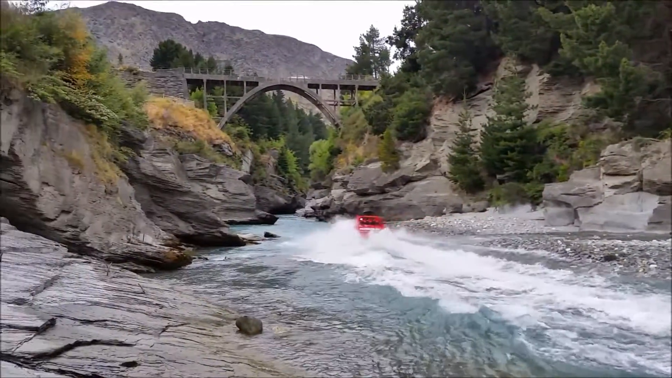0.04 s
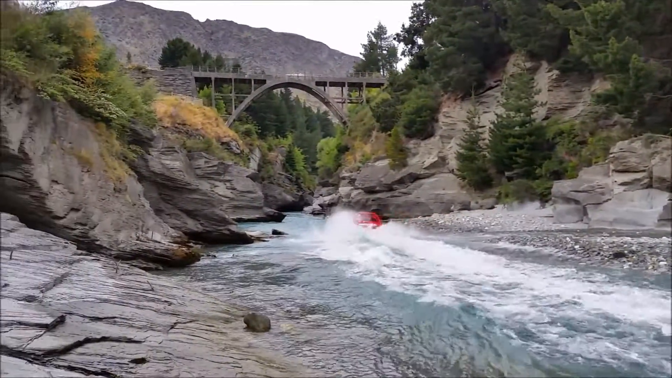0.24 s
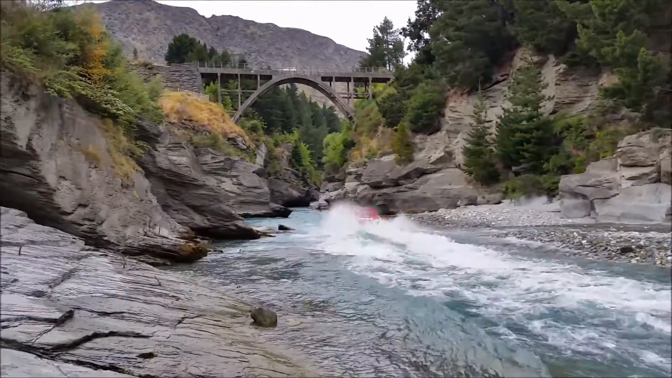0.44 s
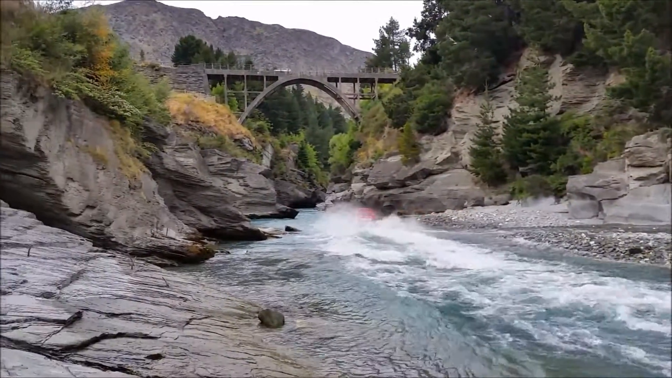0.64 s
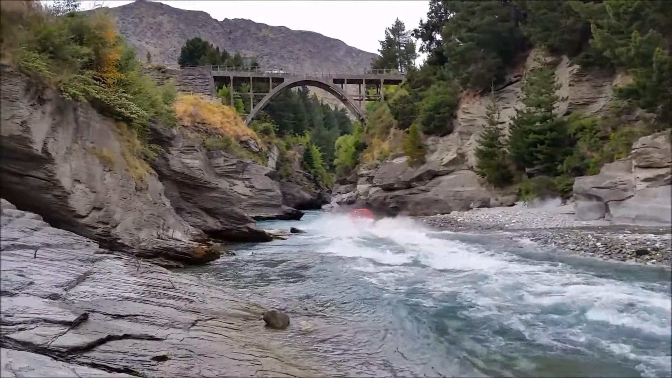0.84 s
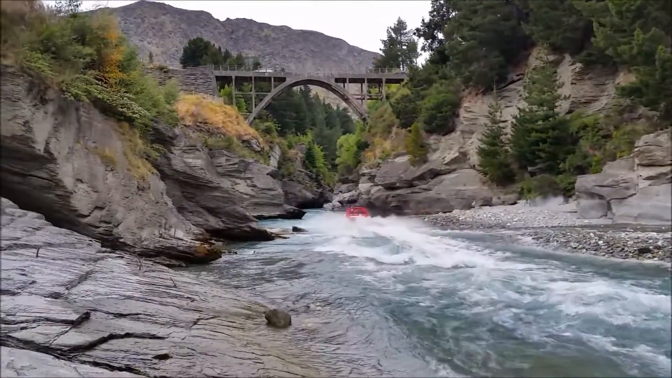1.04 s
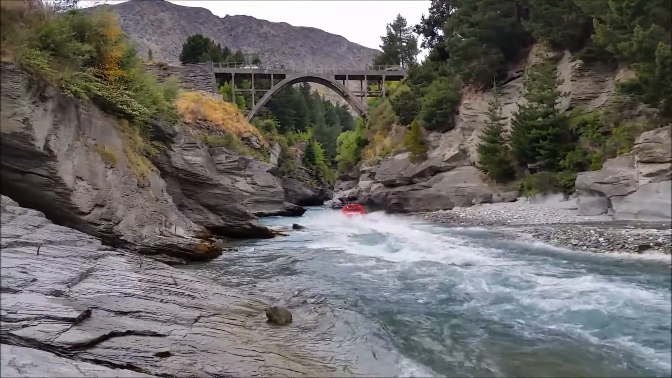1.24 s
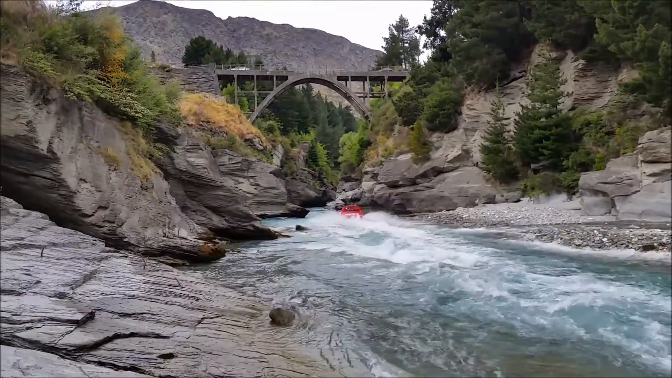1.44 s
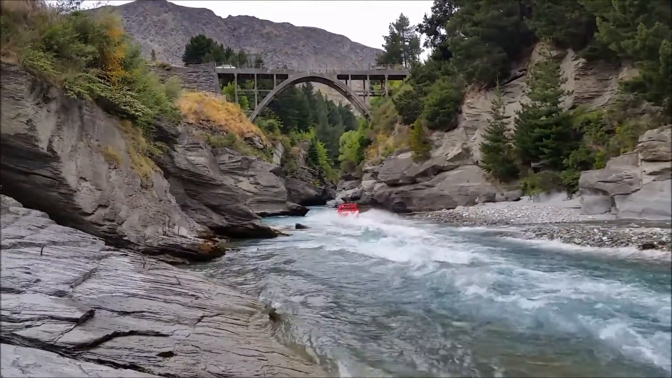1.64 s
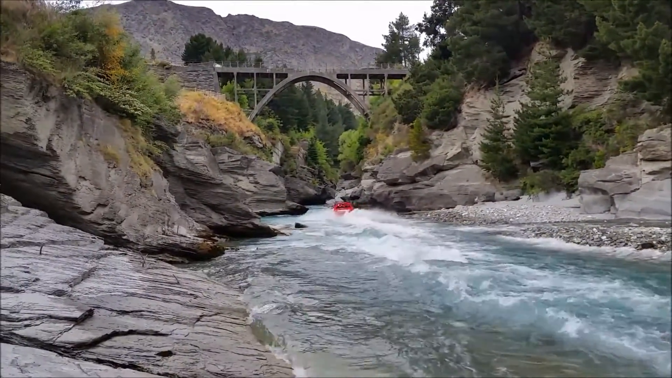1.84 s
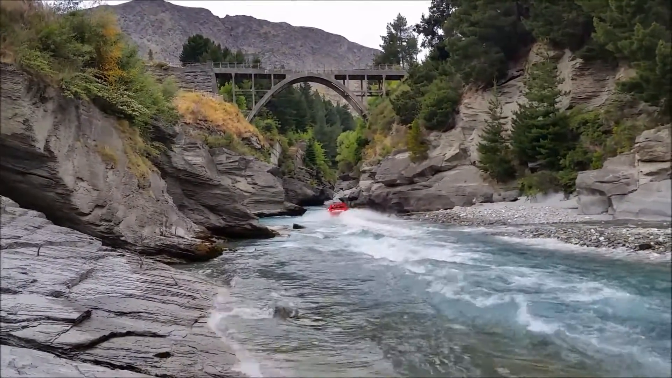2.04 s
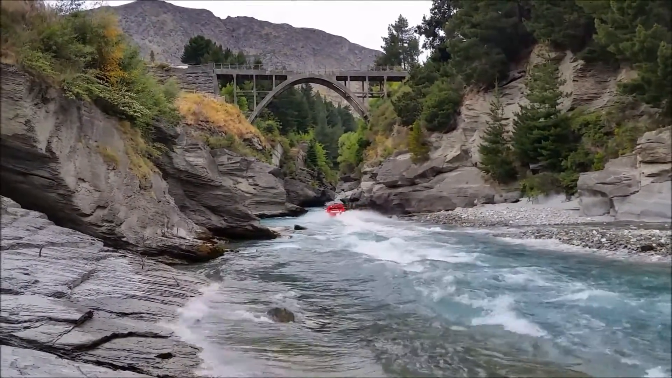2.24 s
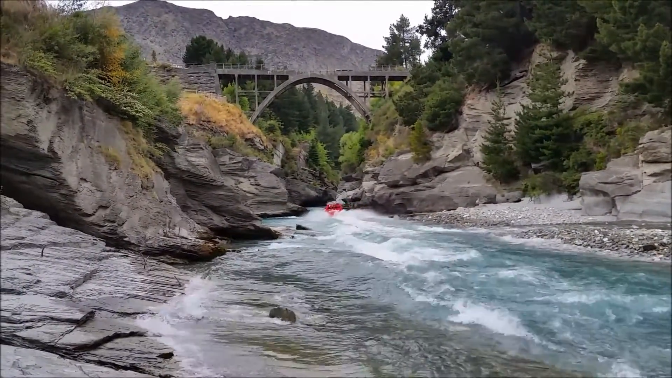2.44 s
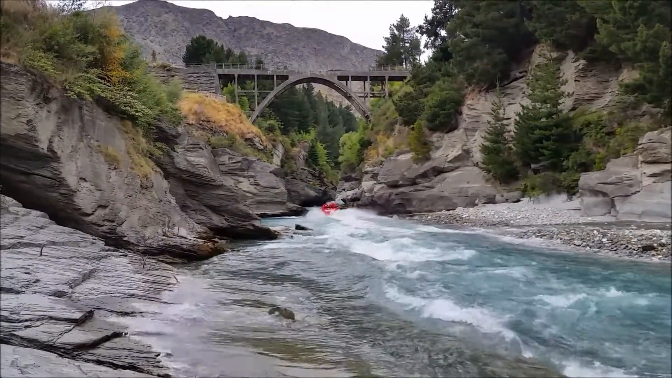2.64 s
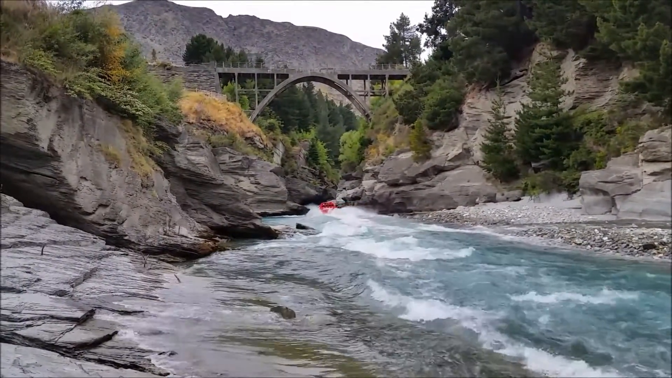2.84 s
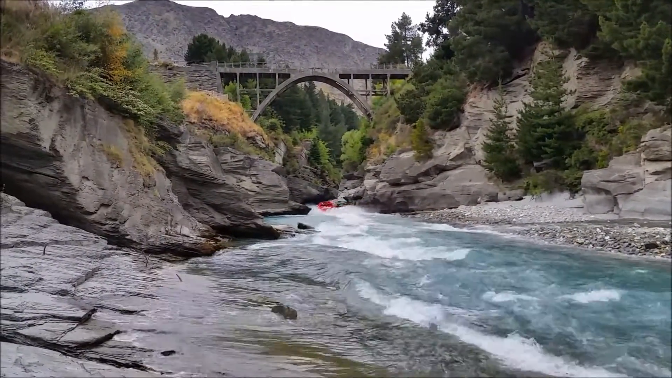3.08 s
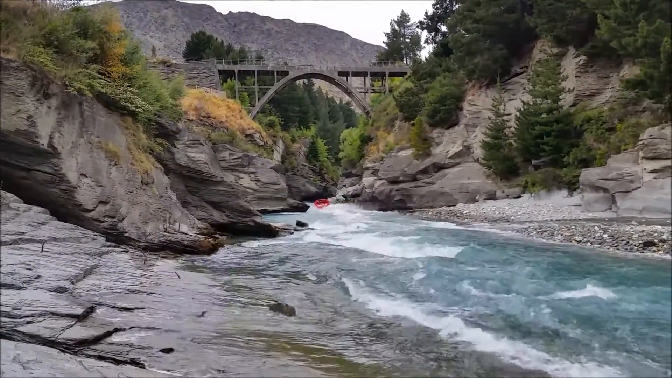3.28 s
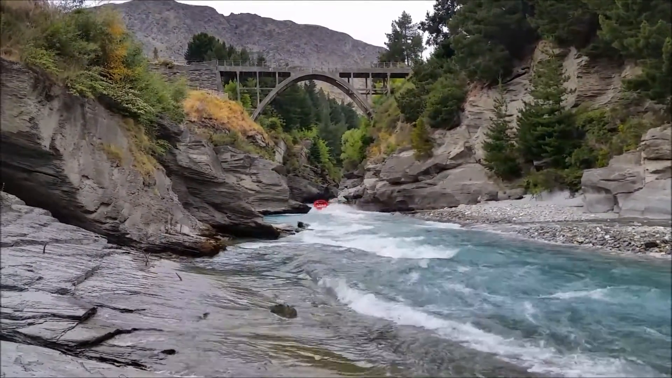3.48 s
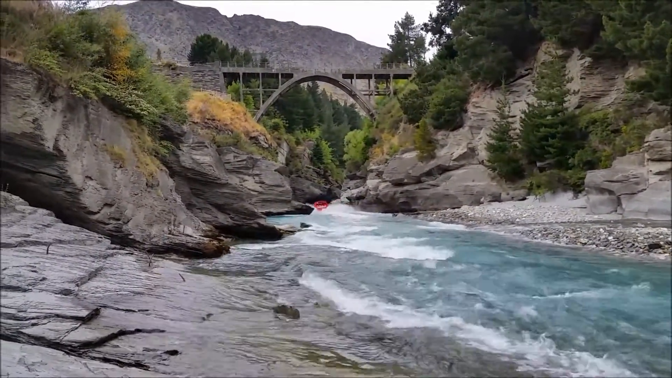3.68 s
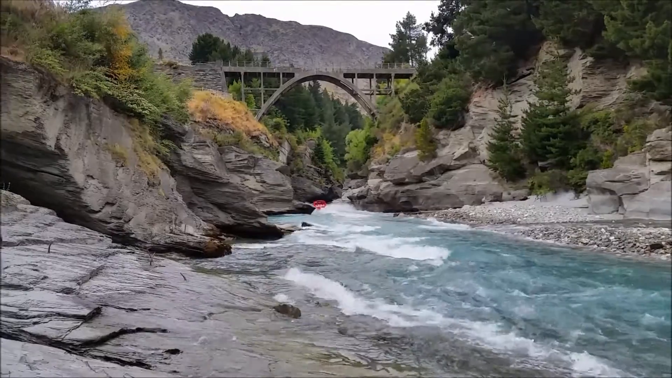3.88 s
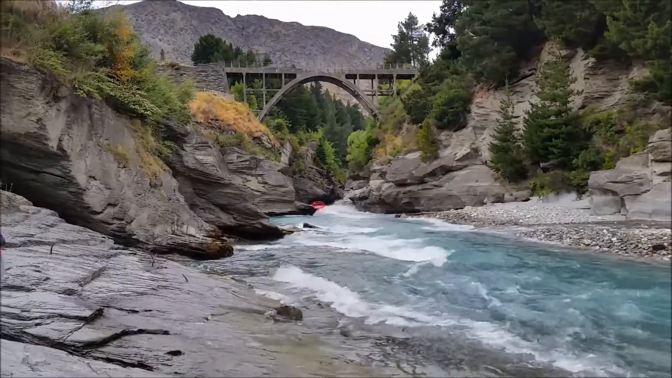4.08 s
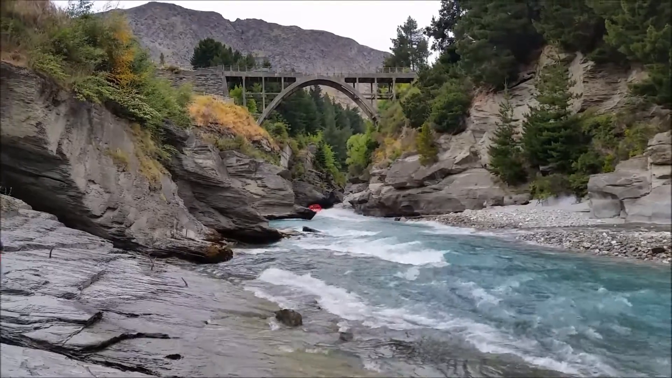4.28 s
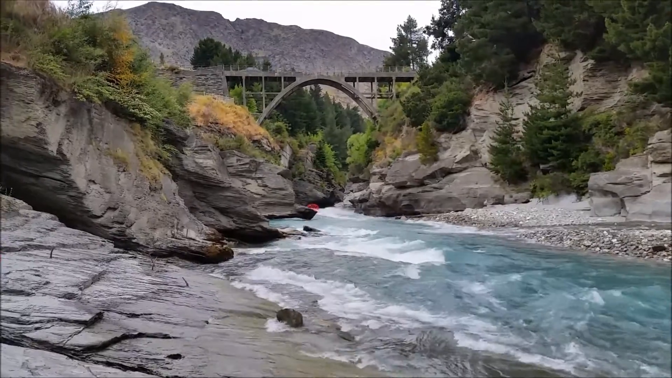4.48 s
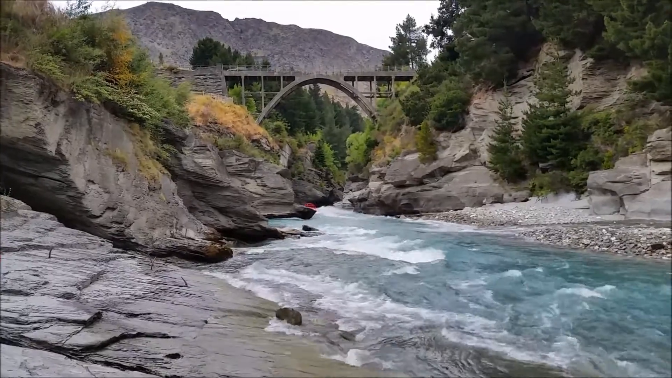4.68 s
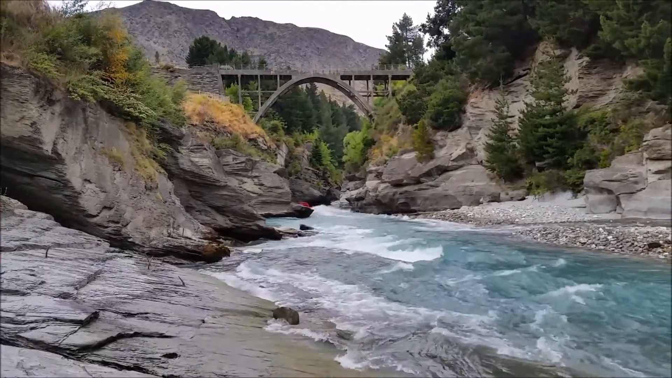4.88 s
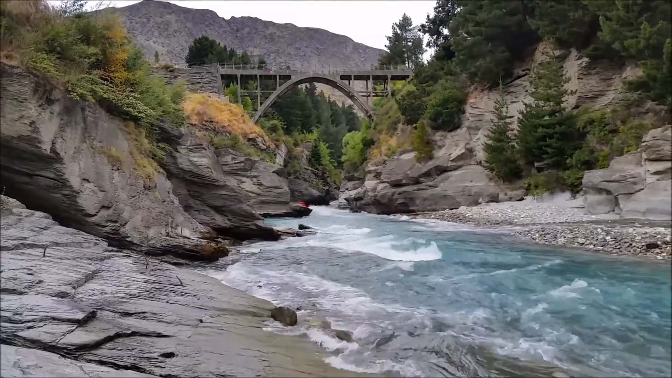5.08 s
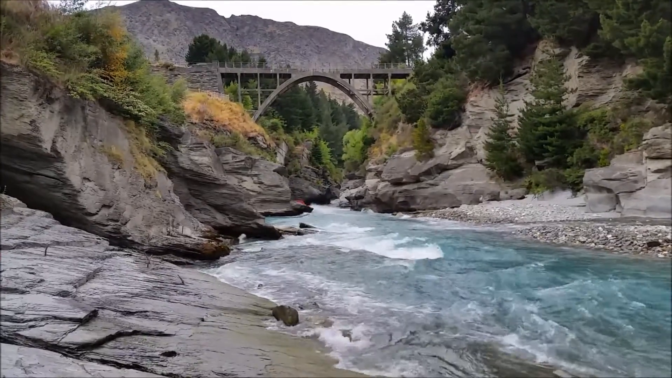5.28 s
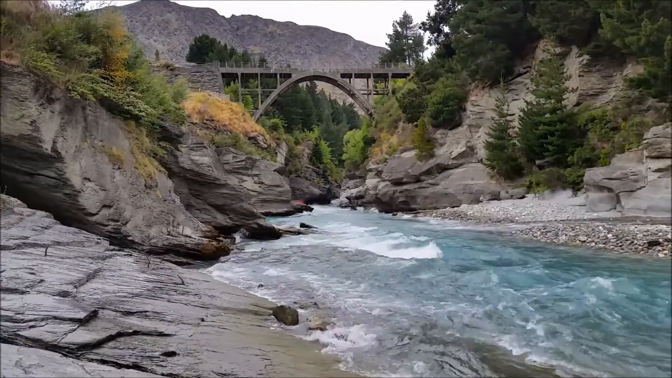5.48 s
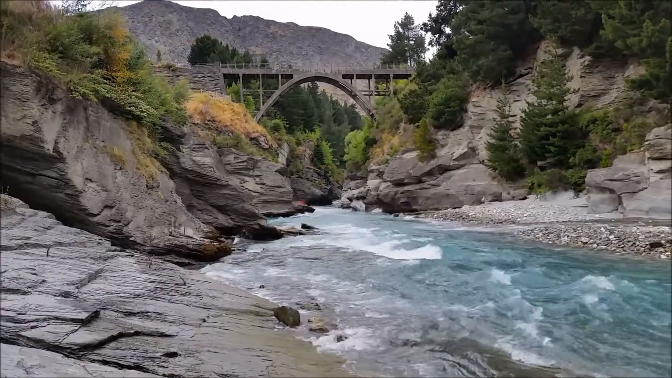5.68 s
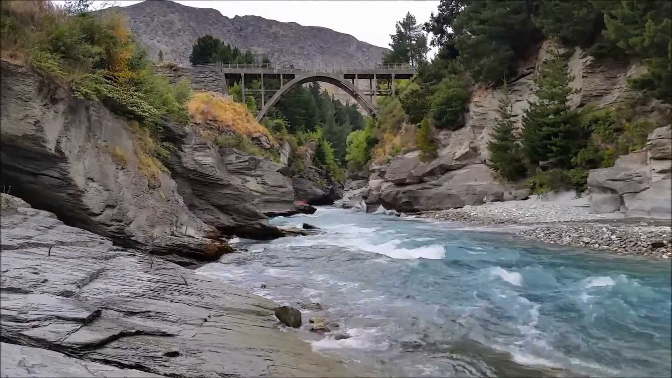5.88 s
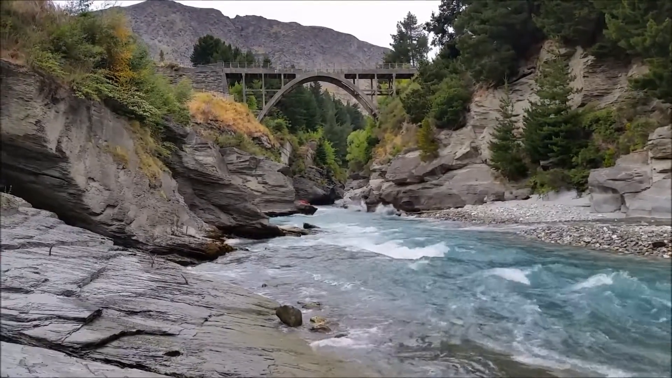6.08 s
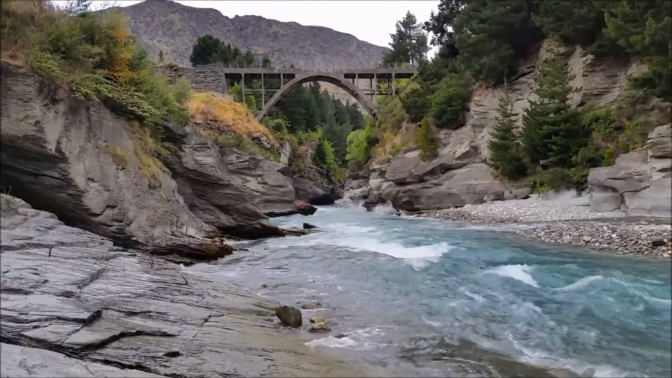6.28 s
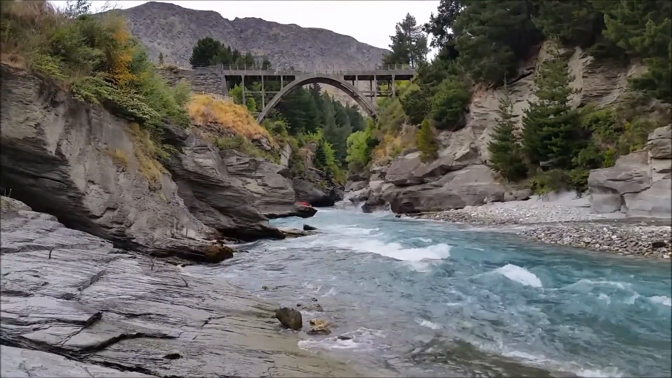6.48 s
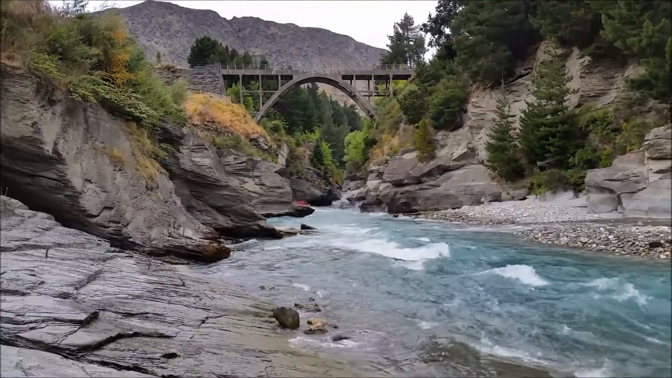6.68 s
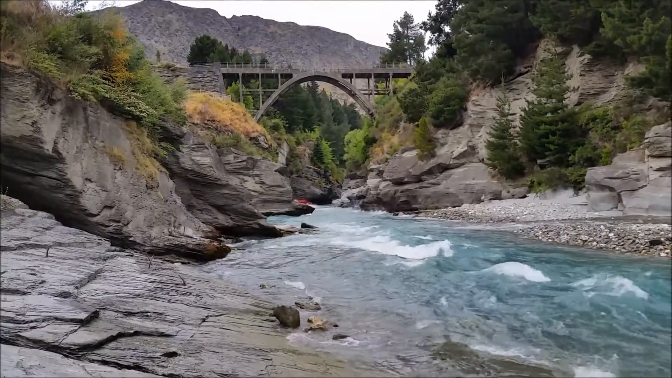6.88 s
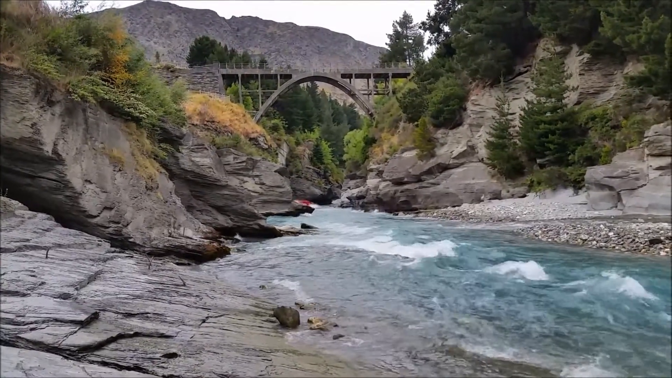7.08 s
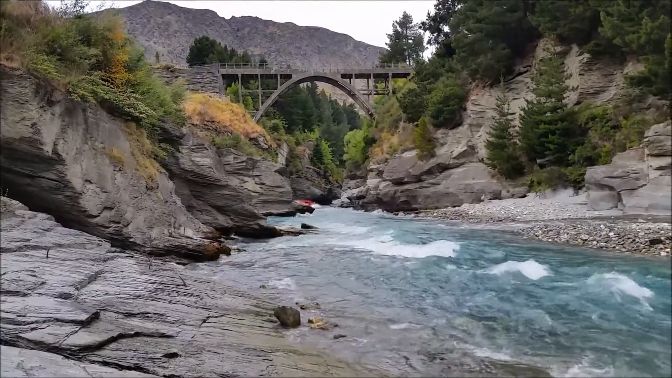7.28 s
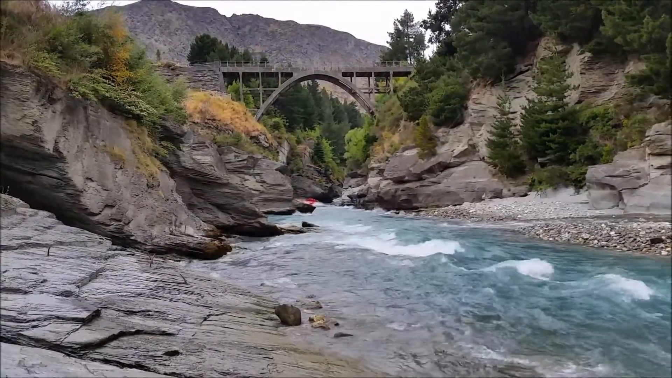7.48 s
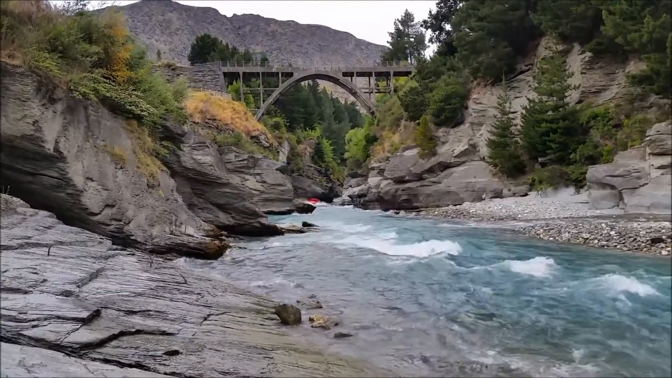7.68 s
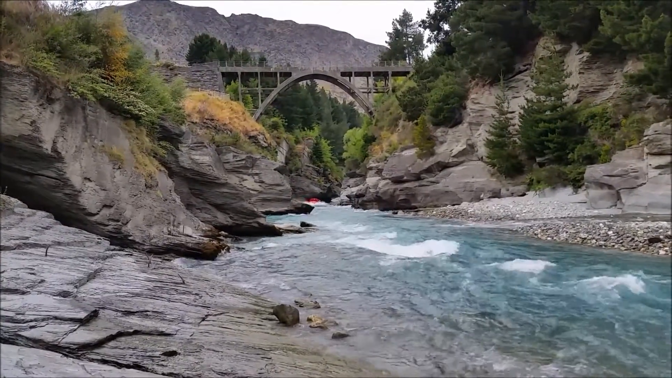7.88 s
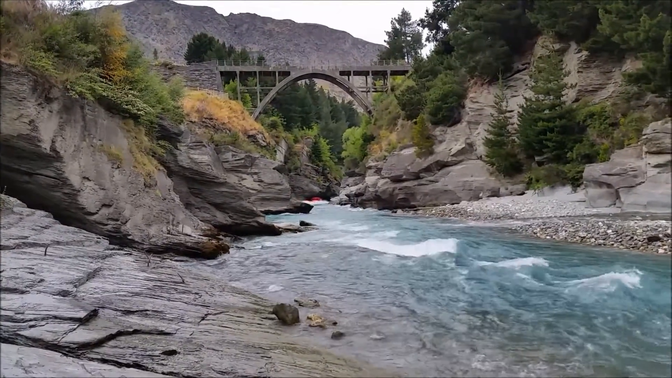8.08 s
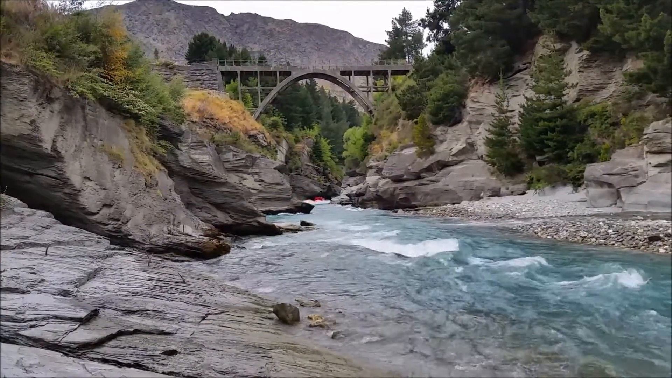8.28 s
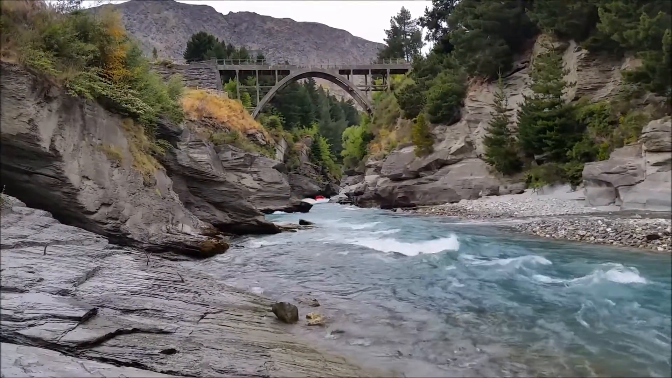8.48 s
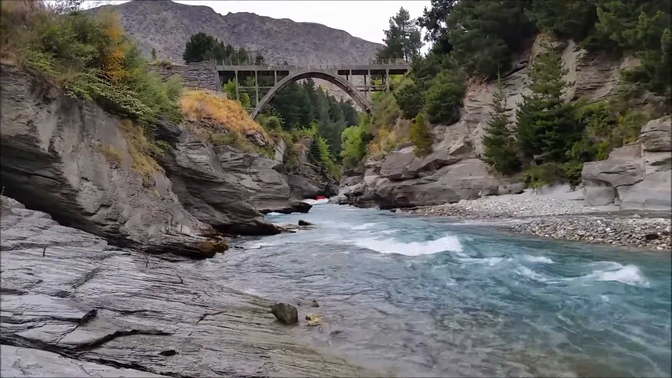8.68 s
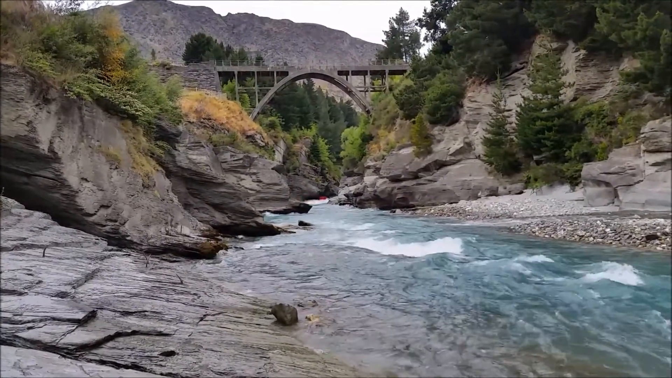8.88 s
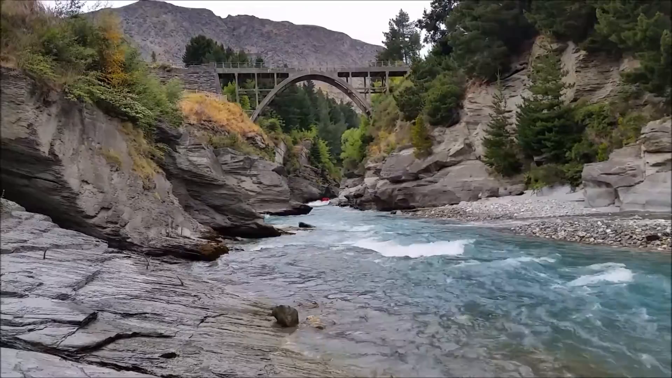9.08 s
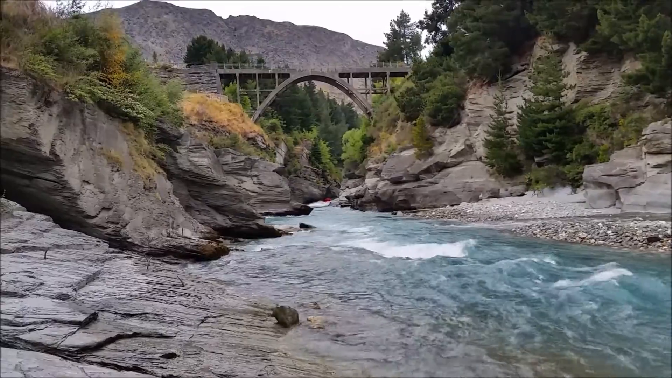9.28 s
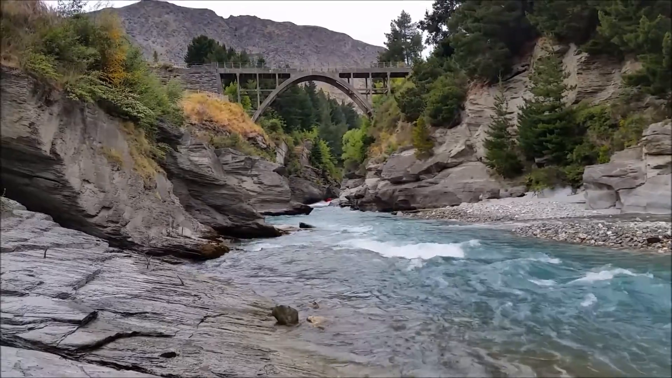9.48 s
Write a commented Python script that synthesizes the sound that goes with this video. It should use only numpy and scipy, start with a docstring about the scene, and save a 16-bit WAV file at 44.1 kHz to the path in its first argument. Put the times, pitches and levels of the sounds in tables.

```python
"""A V8 jet boat speeds away up a rocky river gorge, its throttle rising and falling, heard from the bank.
Its exhaust is a lumpy chord of sines over pulsed noise, the chord echoed by the cliffs; its water jet is filtered noise.
Close by, rapids rush and gurgle with ringing bubbles and the wake fizzes on flat rocks as noise and ticks.
Spray and single drops fall; gusts buffet the left microphone. Both microphone ports ring, and the
recorder's gain control ducks everything for a moment under loud booms and gusts."""
import sys
import numpy as np
from scipy import signal
from scipy.fft import rfft, irfft, next_fast_len
from scipy.io import wavfile
from scipy.ndimage import uniform_filter1d

SR = 44100
rng = np.random.default_rng(int(sys.argv[2]) if len(sys.argv) > 2 else 0)


def pcm_store(signal):
    """Save signal as 16-bit PCM."""
    levels = np.round(np.clip(np.atleast_2d(signal), -1, 1) * 32767)
    wavfile.write(sys.argv[1], SR, levels.astype(np.int16).T)


N = 420273
TIME = np.arange(N) / SR
SIZE = next_fast_len(N, True)
FREQ = np.fft.rfftfreq(SIZE, 1 / SR)


def undb(db):
    """Decibels to amplitude gain."""
    return 10 ** (np.asarray(db) / 20)


def unit(x):
    """Scale to rms 1 over all channels together."""
    return x / np.sqrt(np.mean(x ** 2))


def curves(table):
    """The columns of a table after its times, as controls interpolated sample by sample."""
    times_s, *columns = np.transpose(table)
    return [np.interp(TIME, times_s, column) for column in columns]


def swells(table):
    """A bell-shaped rise in dB for each row, summed."""
    return sum(rise_db * np.exp(-((TIME - centre_s) / half_s) ** 2) for centre_s, half_s, rise_db in table)


def colour(x, table):
    """Filter by a spectrum of one column, or one for each ear; rms 1."""
    hz, *columns = np.transpose(table)
    gain = undb([np.interp(np.log(FREQ + 1), np.log(hz), column) for column in columns])
    return unit(irfft(rfft(x, SIZE) * gain, SIZE)[:, :N])


def walk(rate):
    """Random control of rms 1: straight lines between chance values, drawn rate times a second."""
    knots = np.arange(int(N / SR * rate) + 3) - rng.random()
    return unit(np.interp(TIME * rate, knots, rng.standard_normal(len(knots))))


def spread(mid, side, side_db):
    """Left and right from a shared and an opposed part; rms 1."""
    return unit(mid + undb(side_db) * side * np.array([[1], [-1]]))


def pops(rate, scatter_db):
    """Random impulses at each ear, rate a second, mostly small with a few large ones; rms 1."""
    size = undb(scatter_db * np.minimum(rng.exponential(size=(2, N)), 6))
    struck = rng.random((2, N)) < rate / SR
    return unit(struck * size * rng.choice([-1, 1], (2, N)))


def ring(hz, cycles, glide):
    """A bubble: a sine that dies by 60 dB in a number of cycles while its pitch rises."""
    turn = np.arange(int(SR * cycles / hz) + 2) * hz / SR
    decay = np.exp(-np.log(1000) * turn / cycles)
    return np.sin(2 * np.pi * turn * (1 + glide * turn / cycles / 2)) * decay


# gusts at the left microphone: centre_s, half_length_s, level_db
GUSTS = [(.3, 0.21, -15.5), (0.897, 0.25, -12.5), (1.47, 0.15, -19), (2.24, 0.079, -9), (2.92, 0.28, -10.5),
         (3.705, 0.27, -16), (4.018, 0.13, -11.5), (7.07, 0.086, -17), (9.17, .2, -23)]
# spectrum of wind in the port: pitch_hz, level_db
WIND_SPECTRUM = [(15, -22), (50, -6.5), (120, 2.5), (200, -5), (300, -10.5), (420, -16), (600, -25),
                 (900, -48), (2000, -59)]


def wind():
    """Gusts funnelled down the gorge buffet the left microphone only, as low noise."""
    strength = sum(undb(db) * np.exp(-((TIME - centre_s) / half_s) ** 2) for centre_s, half_s, db in GUSTS)
    buffet = colour(rng.standard_normal(N), WIND_SPECTRUM) * strength * undb(0.66 * walk(25.43))
    return buffet * np.array([[1], [0]])


# spectrum of the rapids: pitch_hz, left_db, right_db
RAPIDS_SPECTRUM = [(40, -11, 5), (300, -1, -3.5), (650, -1, -5.5), (1050, 2, -4), (1570, -1.95, -7.5),
                   (1850, -0.5, -10.5), (2240, -4.5, -7), (2520, -10, -13.5), (4400, -18, -23.5),
                   (5040, -41, -34), (9000, -41, -28)]


def rapids(level_db):
    """Broken water: a broad rush with gurgling bubbles of many sizes, each size coming in its own bursts."""
    bubbles = np.zeros((2, N))
    for hz in np.geomspace(480, 4500, num=9):
        bursts = pops(rate=110, scatter_db=2) * undb(2.7 * walk(9))
        bubble = unit(ring(hz, cycles=9.0, glide=0.2)) * hz
        bubbles += signal.oaconvolve(bursts, bubble[None], axes=1)[:, :N]
    rush = rng.standard_normal((2, N)) + undb(-13.0) * unit(bubbles)
    return colour(rush, RAPIDS_SPECTRUM) * undb(level_db + 0.52 * walk(14))


# spectrum of the foam: pitch_hz, left_db, right_db
FOAM_SPECTRUM = [(1000, 4, -1), (2720, 1, -1.5), (4400, 5, 3.5), (4970, 1, 0.5), (6770, -1.5, 0),
                 (8700, -0.2, -14), (12000, -0.5, -5), (16000, 0.5, -1.5)]


def foam(level_db):
    """The wake breaks on the rocks into countless tiny bursting bubbles, coming in flurries."""
    # a shared flicker, and a faster one of its own for each ear
    flurry_db = 0.28 * walk(11) + np.array([0.9 * walk(35), 1.8 * walk(35)])
    # the smallest bubbles give the sharpest ticks, stronger at the right ear
    ticks = unit(np.diff(pops(rate=4000, scatter_db=3.5), prepend=0))
    fizz = rng.standard_normal((2, N)) + undb([[-4], [0]]) * ticks
    return colour(fizz, FOAM_SPECTRUM) * undb(level_db + flurry_db)


# waves of the wake breaking along the bank: centre_s, half_length_s, foam_rise_db
WAVES = [(1.15, 0.33, 2.5), (2, 0.5, 4), (2.62, 0.22, 3), (4.2, 0.32, 3.5), (5.5, 0.72, 3.5),
         (6.92, 0.27, 2), (7.7, 0.74, 2), (9.28, 0.24, 2.5)]
# the river settles steadily behind the boat
FOAM_START_DB, FOAM_FADE_DB_PER_S = -35.5, 0.8359
RAPIDS_START_DB, RAPIDS_FADE_DB_PER_S = -31.5, 0.2548
RAPIDS_WAVE_SHARE = .6  # of each wave's rise in dB


def river():
    """Each wave of the wake lifts the foam and, less so, the rapids; both die down with time."""
    wave_db = swells(WAVES)
    rapids_db = RAPIDS_START_DB - RAPIDS_FADE_DB_PER_S * TIME + RAPIDS_WAVE_SHARE * wave_db
    foam_db = FOAM_START_DB - FOAM_FADE_DB_PER_S * TIME + wave_db
    return rapids(rapids_db) + foam(foam_db)


# drops slapping the rock: start_s, level_db, pitch_hz
DROPS = [(.550, -37.5, 14200), (4.142, -36.5, 14500), (6.679, -37, 14900), (7.055, -34, 9800),
         (7.622, -37.5, 15000), (7.638, -34, 4600), (9.072, -41, 9400), (9.314, -38.5, 9700)]


def drops():
    """Single drops land with a noise tick and a tiny ringing bubble."""
    out = np.zeros((2, N))
    for start_s, level_db, hz in DROPS:
        bubble = ring(hz, cycles=140, glide=.08)
        tick_decay = np.exp(-np.arange(len(bubble)) / SR / .002)
        tick = rng.standard_normal((2, len(bubble))) * tick_decay
        start = int(start_s * SR)
        out[:, start:start + len(bubble)] += undb(level_db) * (bubble + .5 * tick)
    return out


# spectrum of the falling spray: pitch_hz, level_db
SPRAY_SPECTRUM = [(3000, -11), (8000, -12), (9400, -16), (10600, -1), (11800, -6), (13500, -10),
                  (16000, -10)]
SPRAY_START_S, SPRAY_ATTACK_S, SPRAY_HOLD_S = 0.79, 0.055, 0.29
SPRAY_DB, SPRAY_FADE_DB_PER_S = -38.5, 27


def spray():
    """A sheet of fine droplets patters down behind the boat: a sudden start, a short hold, a fade."""
    patter = rng.standard_normal((2, N)) + undb(-5) * pops(rate=3000, scatter_db=9)
    age_s = TIME - SPRAY_START_S
    attack = np.clip(age_s / SPRAY_ATTACK_S, 0, 1)
    fade_db = SPRAY_FADE_DB_PER_S * np.maximum(age_s - SPRAY_ATTACK_S - SPRAY_HOLD_S, 0)
    return colour(patter, SPRAY_SPECTRUM) * attack * undb(SPRAY_DB - fade_db)


# spectrum of the water jet: pitch_hz, left_db, right_db
JET_SPECTRUM = [(120, -20, -10), (300, -2.5, -2), (500, 4, 2), (697, 3.5, 0), (884, -3, -10),
                (1420, -21, -17), (4000, -51, -51)]
# level of the water jet: time_s, level_db
JET_LEVEL = [(0, -39), (.3, -31), (.9, -30.5), (1.5, -33), (2.1, -30), (2.8, -31), (3.6, -36), (4, -33),
             (5.9, -33), (9.53, -35.5)]


def jet():
    """The hollow roar of water thrown from the stern, far off: noise nearly alike at both ears."""
    level_db, = curves(JET_LEVEL)
    roar = colour(spread(*rng.standard_normal((2, N)), side_db=-24), JET_SPECTRUM)
    return roar * undb(level_db + 1.0 * walk(16))


# strong tones of the uneven firing, by range: multiple_of_cycle_rate, level_db
DEEP_TONES = [(3, 2)]
MIDDLE_TONES = [(5, 2), (6, -9)]
UPPER_TONES = [(8, 2), (9, 0), (11, -2)]
WHINE_TONES = [(13, -6)]
STRONG_TONES = DEEP_TONES + MIDDLE_TONES + UPPER_TONES + WHINE_TONES
# the pipe's lowest resonance: pitch_hz, level_db
BOOM_SPECTRUM = [(20, -41), (38, -28), (55, -6), (75, -1), (125, -3), (160, -11), (220, -19.5), (500, -60)]
# the pipe's upper resonances: pitch_hz, level_db
GROWL_SPECTRUM = [(110, -10), (165, -6.5), (195, 1), (235, -0.5), (265, -4), (300, -5.5), (345, -14),
                  (600, -42), (1500, -69)]
# level of the rough burble: time_s, boom_db, growl_db
BURBLE_LEVEL = [(0, -19.5, -25), (.3, -13.5, -25), (.9, -19.5, -21.5), (1.6, -23, -27), (2.1, -17, -26),
                (2.85, -22, -27.5), (3.3, -22.5, -30), (3.95, -24, -32), (4.3, -24, -27),
                (4.8, -22.5, -26.5), (5.25, -24.5, -29), (5.9, -21.5, -28.5), (6.3, -23.5, -30),
                (6.9, -18.5, -33.5), (7.3, -22.5, -28), (8.2, -29, -28.5), (8.6, -24, -26.5),
                (9.25, -23.5, -28), (9.53, -27.5, -28.5)]


def burble(cycle_hz):
    """Eight gas puffs a cycle blow through the water and ring the pipe; part of their pattern repeats every cycle."""
    boom_db, growl_db = curves(BURBLE_LEVEL)
    cycle = np.cumsum(cycle_hz) / SR
    gas_noise = spread(*rng.standard_normal((2, N)), side_db=-9)
    puffs = gas_noise * (1 + .7 * np.cos(2 * np.pi * 8 * cycle))
    weak_orders = np.setdiff1d(np.arange(2, 17), [order for order, _ in STRONG_TONES])
    throb = sum((1 + .5 * walk(4)) * np.sin(2 * np.pi * (order * cycle + rng.random()))
                for order in weak_orders)
    # all of the throb's power lies low, so a small share stands level with the broad gas noise there
    gas = puffs + undb(-24.5) * unit(throb)
    return colour(gas, BOOM_SPECTRUM) * undb(boom_db) + colour(gas, GROWL_SPECTRUM) * undb(growl_db)


# each tone swells as it slides through a resonance of the pipe: pitch_hz, level_db
PIPE = [(52, -25), (63, -17), (75, -0.5), (85, -1), (98, 0), (113, 1.5), (124, -3), (136, -1), (146, -4),
        (158, 0.5), (205, 0), (243, -0.5), (268, -8.5), (310, -6.5), (420, -15)]


def partials(cycle_hz, tones, level_db):
    """Tones on multiples of the cycle rate; the pipe colours them and they flutter as the hull bounces."""
    cycle = np.cumsum(cycle_hz) / SR
    pipe_hz, pipe_db = np.transpose(PIPE)
    total = np.zeros(N)
    for order, tone_db in tones:
        resonance_db = np.interp(np.log(order * cycle_hz), np.log(pipe_hz), pipe_db)
        size = undb(level_db + tone_db + resonance_db + 1.8 * walk(12))
        total += size * np.sin(2 * np.pi * (order * cycle + rng.random()) + 0.14 * walk(13))
    return total


def gorge(x, t60, side_db):
    """Scattered cliff echoes: decaying noise tails, one shared by the ears and one opposed."""
    t = np.arange(2 * SR) / SR
    tails = rng.standard_normal((2, len(t))) * np.exp(-np.log(1000) * t / t60)
    tails /= np.linalg.norm(tails, axis=1, keepdims=True)
    mid, side = signal.fftconvolve(x[None], tails, axes=1)[:, :N]
    return spread(mid, side, side_db) * np.std(x)


# level of the exhaust's deepest tone: time_s, level_db
DEEP_LEVEL = [(0, -27.5), (.17, -6.5), (.36, -21), (.55, -9), (.75, -10.5), (.88, -21.5), (1.6, -19.5),
              (2.7, -19.5), (4.6, -26), (5.15, -21.5), (5.4, -28.5), (7.3, -30), (7.7, -17), (8.95, -23.5),
              (9.2, -33)]
# level of its middle tones: time_s, level_db
MIDDLE_LEVEL = [(0, -18.5), (1.4, -27.5), (2.2, -24), (2.75, -33), (3.03, -17), (3.2, -24), (4.3, -21),
                (4.65, -23), (4.85, -20.5), (5.2, -26.5), (6.5, -27.5), (7.05, -18), (7.4, -26.5),
                (7.7, -16.5), (8.1, -28), (9.3, -19.5), (9.53, -30.5)]
# level of its upper tones, shaded once the boat is behind the rocks: time_s, level_db
UPPER_LEVEL = [(0, -30), (1.2, -30.5), (2, -25), (3, -24.5), (3.95, -29.5), (4.8, -24.5), (5.05, -32.5),
               (6.8, -42.5), (7.7, -33.5), (8.7, -37), (9.25, -31), (9.53, -32)]
# the whine stands out as the throttle is lifted: centre_s, half_length_s, rise_db
LIFTS = [(4.4, .45, 12.5), (9.27, 0.29, 11.5)]
# the far cliff's echo grows as the boat nears the bend, then eases: time_s, level_db
CLIFF_LEVEL = [(0, -25.5), (7, -7.5), (9.5, -13)]
CLIFF_DELAY_S = .27


def drone(cycle_hz):
    """Uneven firing of the two cylinder banks gives a lumpy chord that echoes in the gorge."""
    deep_db, = curves(DEEP_LEVEL)
    middle_db, = curves(MIDDLE_LEVEL)
    upper_db, = curves(UPPER_LEVEL)
    tones = partials(cycle_hz, DEEP_TONES, deep_db)
    tones += partials(cycle_hz, MIDDLE_TONES, middle_db)
    tones += partials(cycle_hz, UPPER_TONES, upper_db)
    tones += partials(cycle_hz, WHINE_TONES, upper_db + swells(LIFTS))
    # the far cliff returns the pitch of a moment ago and beats with it
    cliff = np.interp(TIME - CLIFF_DELAY_S, TIME, tones) * undb(curves(CLIFF_LEVEL)[0])
    # root 2 gives a sine of amplitude 1 an rms of 1
    return np.sqrt(2) * (tones + cliff) + undb(-12.5) * gorge(tones, t60=0.96, side_db=-2.5)


# engine speed as the cycle rate, half the crank speed: time_s, cycle_rate_hz
REVS = [(0, 26.4), (.6, 29.3), (1.1, 25), (1.55, 25.8), (2, 23.7), (2.35, 24.9), (3.05, 21.1), (3.95, 20.3),
        (4.6, 17.2), (4.85, 19), (5.1, 27.5), (5.4, 31.8), (5.8, 31.5), (6.15, 22), (6.55, 19), (7.3, 22.3),
        (7.7, 22.7), (8.05, 26.6), (8.95, 30.8), (9.2, 24), (9.53, 22.4)]


def boat():
    """Exhaust tones and burble share the engine's speed; the jet roars behind them."""
    cycle_hz, = curves(REVS)
    return jet() + burble(cycle_hz) + drone(cycle_hz)


def scene():
    """A little wind, the near river with its drops and spray, and the far boat."""
    return wind() + river() + drops() + spray() + boat()


# the recorder's gain control: rms ceiling, time over which it listens, recovery time
CEILING_DB, LISTEN_S, RECOVER_S = -9.5, 0.042, 0.055


def gain_control(x):
    """Turns both ears down while the louder one exceeds the ceiling, then recovers, so booms duck the river."""
    power = uniform_filter1d(x ** 2, int(LISTEN_S * SR), axis=1).max(axis=0)
    excess_db = np.maximum(10 * np.log10(np.maximum(power, 1e-12)) - CEILING_DB, 0)
    # a running maximum under a rising exponential makes each cut in dB decay exponentially
    recovery = np.exp(TIME / RECOVER_S)
    cut_db = np.maximum.accumulate(excess_db * recovery) / recovery
    return x * undb(-cut_db)


# microphone ports, left then right: pitch_hz, width_hz, gain_db
PORTS = [(9360, 1350, 15.5), (15180, 1450, 16)]
TOP_HZ = 15750


def record(dry):
    """Each port rings at its own pitch; gain control acts, peaks are rounded and the top is cut steeply."""
    ports = []
    for hz, width_hz, gain_db in PORTS:
        damping = 1j * FREQ * width_hz
        ports.append(1 + (undb(gain_db) - 1) * damping / (hz ** 2 - FREQ ** 2 + damping))
    ringing = irfft(rfft(dry, SIZE) * np.array(ports), SIZE)[:, :N]
    heard = gain_control(ringing)
    rounded = heard / (1 + (heard / .95) ** 8) ** (1 / 8)
    top_cut = signal.ellip(12, .2, 90, TOP_HZ, fs=SR, output="sos")
    return signal.sosfilt(top_cut, rounded)


dry = scene()
out = record(dry)
pcm_store(out)
```